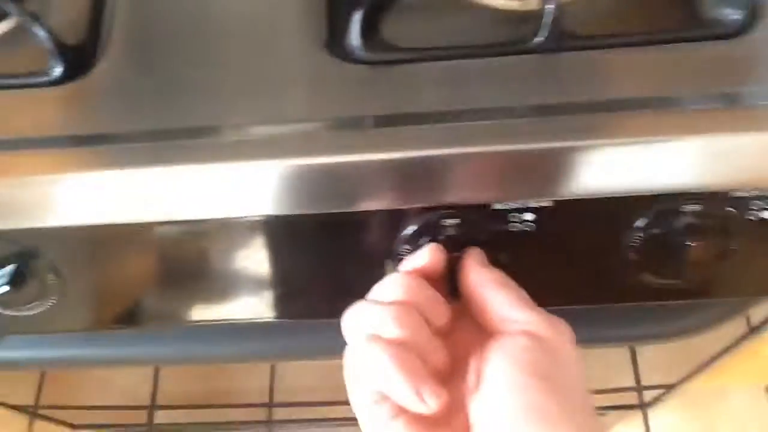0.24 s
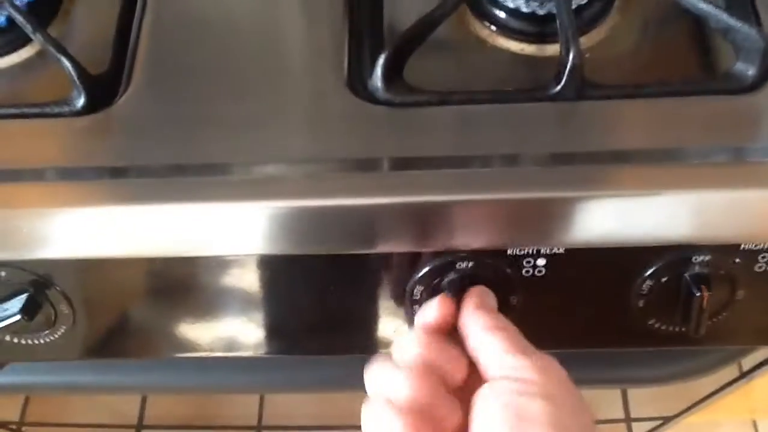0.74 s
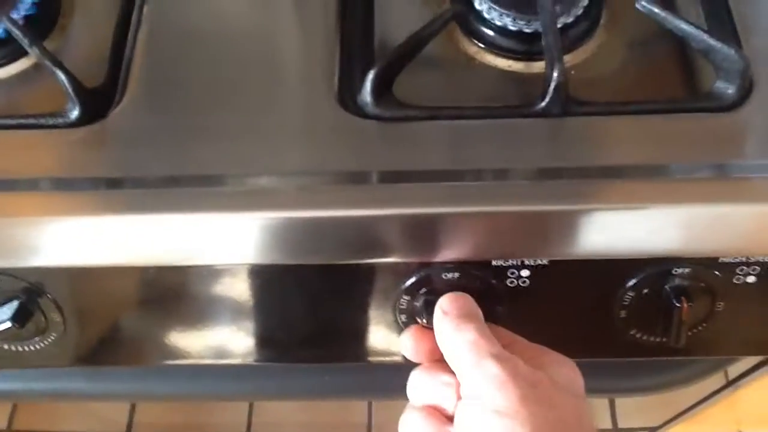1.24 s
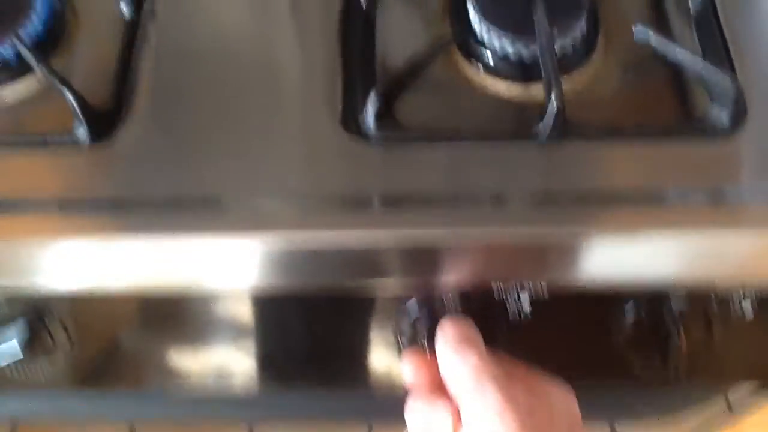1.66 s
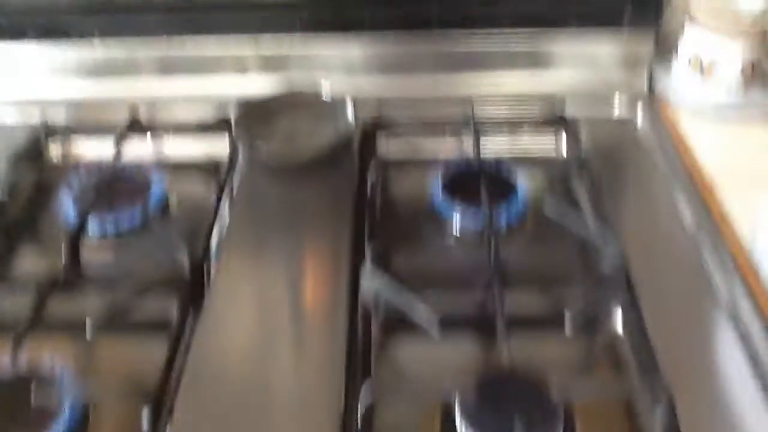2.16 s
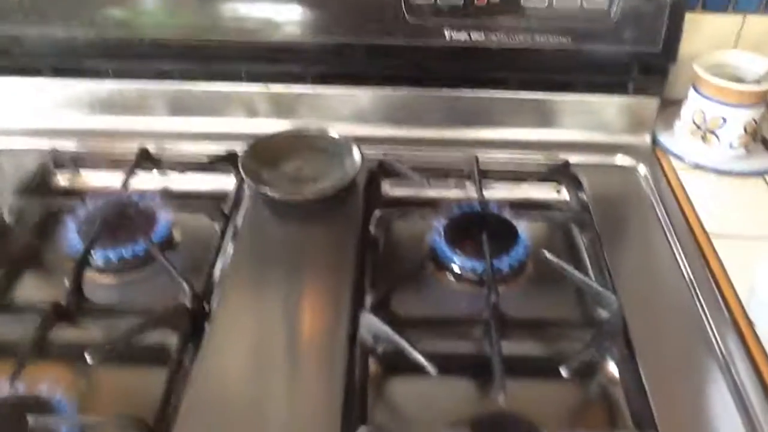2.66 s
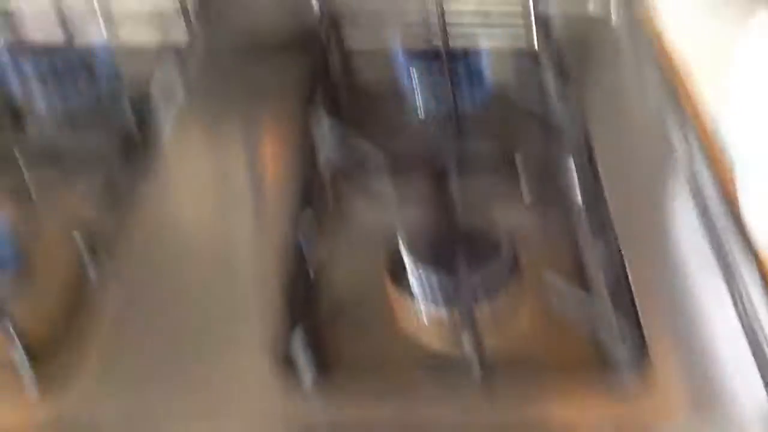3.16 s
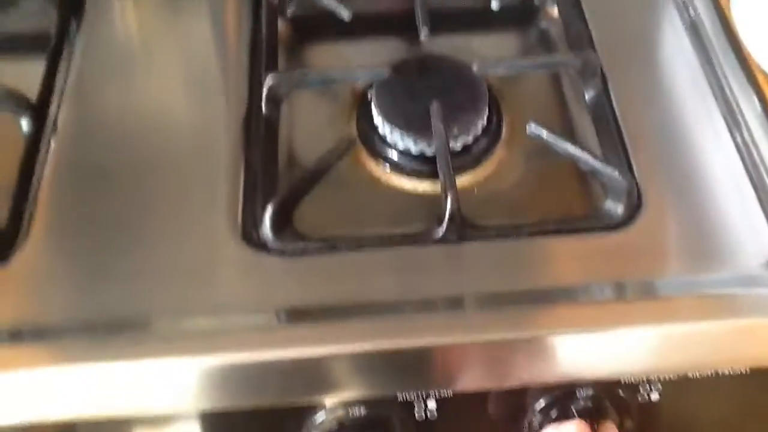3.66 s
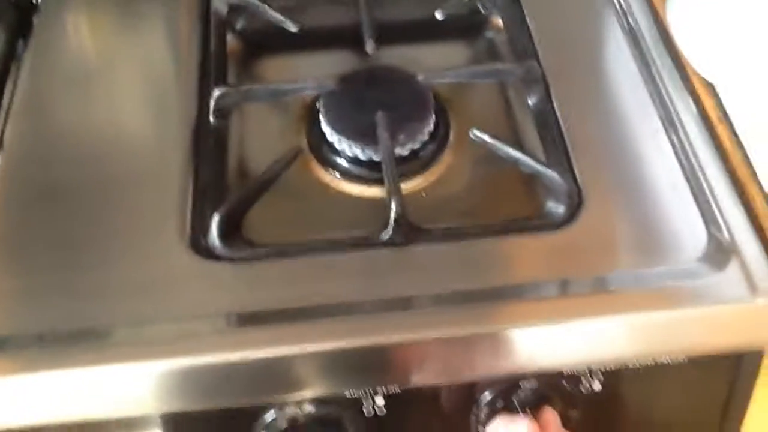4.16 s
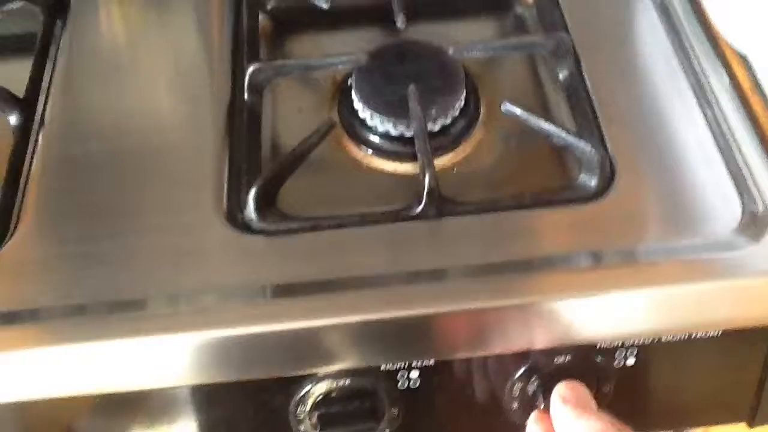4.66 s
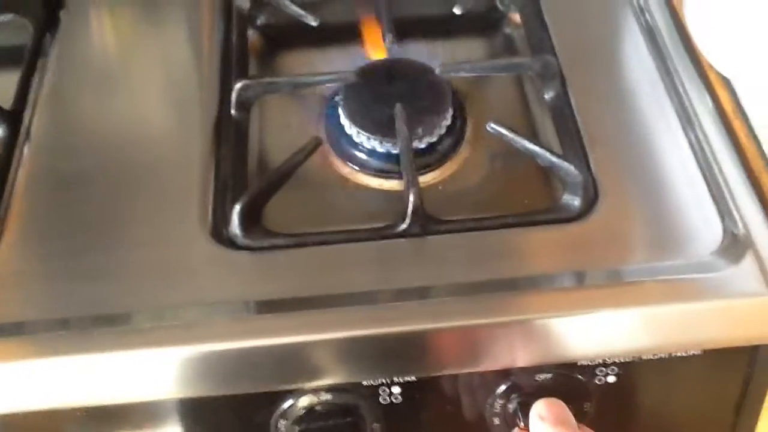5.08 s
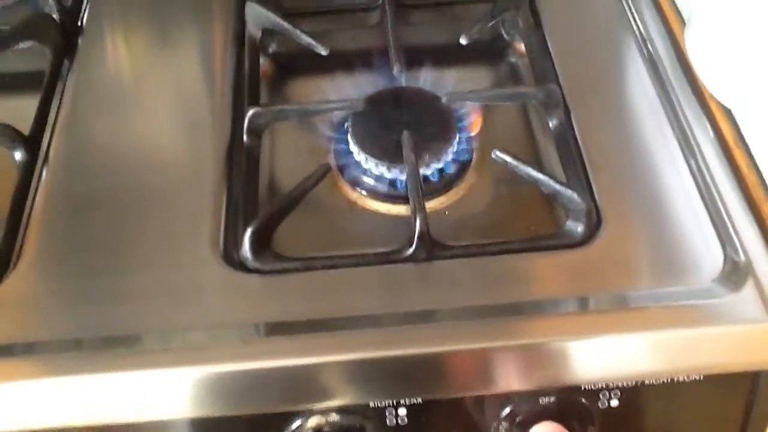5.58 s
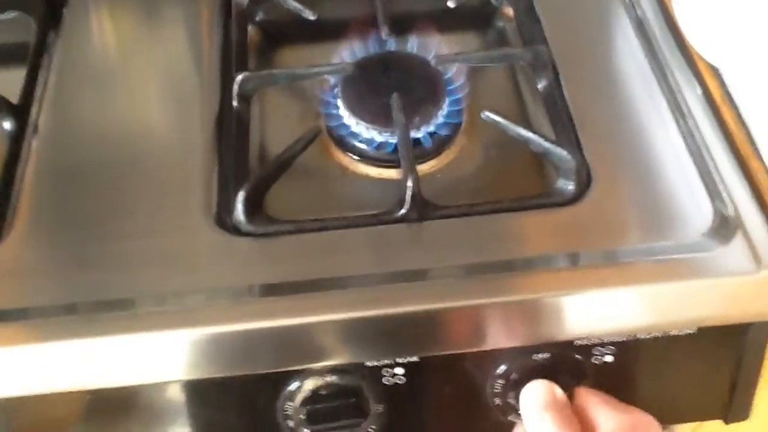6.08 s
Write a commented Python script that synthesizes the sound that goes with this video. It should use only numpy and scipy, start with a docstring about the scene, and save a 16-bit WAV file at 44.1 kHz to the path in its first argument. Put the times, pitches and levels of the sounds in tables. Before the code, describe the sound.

A gas burner igniter snaps rapidly and the flame catches with a soft flutter, twice, amid knob clicks, handling bumps and steady burner hiss.

```python
"""A gas stove in a kitchen, heard by a hand-held phone. From the start lit burners hiss (shaped noise) over the
room's rumble, while the grip sends ticks (noise pushes) and thumps (gliding sines) into the microphone.
From 0.5 s a hand works the plastic knobs: rubs of scraping noise, clicks of ringing modes. From 1.04 s the igniter
sparks about six times a second (noise cracks, echoes) and gas catches with a crackling flutter of random pops.
Near 5 s it sparks and catches again; from 5.3 s one more burner adds to the hiss."""
import sys
import numpy as np
from scipy import signal
from scipy.fft import rfft, irfft, next_fast_len
from scipy.io import wavfile
from scipy.ndimage import map_coordinates

SR = 44100
rng = np.random.default_rng(int(sys.argv[2]) if len(sys.argv) > 2 else 0)


def transcribe(signal):
    """Save signal, clipped to [-1, 1], as a 16-bit WAV file at the path in sys.argv[1]."""
    frames = np.atleast_2d(signal).T
    limited = np.clip(frames, -1, 1)
    pcm = np.round(limited * 32767).astype(np.int16)
    wavfile.write(sys.argv[1], SR, pcm)


N = 279594


def amp(db):
    """Decibels to gain."""
    return 10 ** (np.asarray(db) / 20)


def unit(x):
    """Scaled to rms 1."""
    return x / np.sqrt(np.mean(x ** 2) + 1e-20)


def along(points, hz):
    """Interpolates (f/Hz, value) points on a log frequency axis."""
    f, v = np.transpose(points)
    return np.interp(np.log(hz + 1), np.log(f + 1), v)


def filtered(x, response):
    """x times a complex response of frequency."""
    n = x.shape[-1]
    padded = next_fast_len(n + 4096)
    f_hz = np.fft.rfftfreq(padded, 1 / SR)
    return irfft(rfft(x, padded) * response(f_hz), padded)[..., :n]


def modes(table):
    """Response of (f/Hz, width/Hz, level/dB) resonances, alternating in sign."""
    def response(f):
        total = 0
        for k, (hz, width_hz, db) in enumerate(table):
            damping = 1j * f * width_hz
            total = total + (-1) ** k * amp(db) * damping / (hz * hz - f * f + damping)
        return total
    return response


def noise(spectrum, lumpy_db=0, rate_hz=30, size=N):
    """Coloured noise of rms 1 whose level wanders rate_hz times a second."""
    points = rng.standard_normal(int(size * rate_hz / SR) + 4)
    lumps = map_coordinates(points, [np.arange(size) * rate_hz / SR])
    lumpy = amp(lumpy_db * lumps) * rng.standard_normal(size)
    return unit(filtered(lumpy, lambda hz: amp(along(spectrum, hz))))


def add(track, start_s, peak_db, sound):
    """Lays a sound on the track with its peak at peak_db."""
    track[round(start_s * SR):][:len(sound)] += amp(peak_db) * sound / np.max(np.abs(sound))


def held(start_s, length_s, rise_s, fall_s):
    """A gain that rises, holds at 1 and dies away."""
    t = np.arange(N) / SR - start_s
    return np.clip(t / rise_s, 0, 1) * np.exp(-np.maximum(t - length_s, 0) / fall_s)


BUSY_S = 0.24


def busy(events):
    """Counts the events near each moment, weighted by a window BUSY_S to either side."""
    marks = np.bincount([round(row[0] * SR) for row in events], minlength=N)[:N]
    return signal.fftconvolve(marks, np.hanning(round(2 * BUSY_S * SR)), "same")


# kitchen decay: f/Hz, t60/s
KITCHEN_T60 = [(500, 0.063), (3000, .35), (8000, 0.25), (15000, 0.17)]


def echoes(size):
    """A new tail of kitchen echoes of energy 1, each frequency dying at its own speed."""
    hz, t, z = signal.stft(rng.standard_normal(size), SR, nperseg=128)
    decay = amp(-60 * t / along(KITCHEN_T60, hz)[:, None])
    tail = signal.istft(z * decay, SR, nperseg=128)[1][:size]
    tail *= np.minimum(np.arange(size) / SR / 0.0011, 1)  # the walls answer late
    return tail / np.linalg.norm(tail)


# room rumble spectrum: f/Hz, level/dB per Hz
RUMBLE_SPECTRUM = [(15, -87), (25, -91), (75, -13), (141, 1.5), (165, -1), (179, -5.5), (313, -7),
                   (353, -13.5), (450, -12.5), (580, -38), (990, -120)]
# hand shifting on the phone, spectrum: f/Hz, level/dB per Hz
RUSTLE_SPECTRUM = [(250, -7), (400, -1.5), (600, -0.5), (900, -15.5), (2500, -30.5)]
# burner hiss spectrum: f/Hz, level/dB per Hz
BURNER_SPECTRUM = [(530, -19), (900, -8), (1070, -3), (1240, -1), (1440, 2), (1670, -3.5), (1930, -3),
                   (2250, -7), (2560, -10.5), (2790, -8.5), (3090, -12), (4120, -28), (4500, -26),
                   (5850, -50), (9900, -120)]
# faint whistling of the gas jets: f/Hz, width/Hz, level/dB
JET_MODES = [(1238, 7.3, -2), (1331, 8.5, 0.5), (2800, 120, -17)]
# microphone hiss spectrum: f/Hz, level/dB per Hz
MIC_SPECTRUM = [(2060, -29), (3500, -8), (4850, -8.5), (5250, -8.5), (9130, -10.5), (13700, -11),
                (15200, -11.5)]
RUMBLE_REST_DB, RUSTLE_REST_DB = -57, -67  # hand at rest
RUMBLE_PER_THUMP_DB, RUSTLE_PER_TICK_DB = 0.58, 1
BURNERS_DB, LAST_LIT_S, LAST_ADDS_DB = -64, 5.32, 2  # the nearest burner joins last
MIC_HISS_DB = -70.5


def background():
    """Rumble and rustle come in lumps and grow while the hand is busy; burner and microphone hiss are smooth."""
    rumble_db = RUMBLE_REST_DB + RUMBLE_PER_THUMP_DB * busy(THUMPS)
    rustle_db = RUSTLE_REST_DB + RUSTLE_PER_TICK_DB * busy(TICKS)
    rumble = amp(rumble_db) * noise(RUMBLE_SPECTRUM, lumpy_db=3.0, rate_hz=12)
    rustle = amp(rustle_db) * noise(RUSTLE_SPECTRUM, lumpy_db=3.5, rate_hz=99)
    whistle = unit(filtered(rng.standard_normal(N), modes(JET_MODES)))
    gas = noise(BURNER_SPECTRUM, lumpy_db=0.93, rate_hz=20) + amp(-8.5) * whistle
    lit_db = BURNERS_DB + LAST_ADDS_DB * held(LAST_LIT_S, N / SR, 0.3, 1)
    return rumble + rustle + amp(lit_db) * gas + amp(MIC_HISS_DB) * noise(MIC_SPECTRUM)


# short ticks, from the grip or the catching gas:
# t/s, peak level/dB, level/dB near 2 kHz re peak, level/dB above 4 kHz re peak
TICKS = [(0.06, -43.5, -11, -12), (0.229, -38.5, -16, -19), (0.242, -37.5, -9.5, -20),
         (0.256, -43, -2.5, -23), (0.649, -44, -12, -17), (0.671, -45, -8, -23), (.766, -49, -20, -25),
         (.789, -55, -20, -25), (1.12, -45, -18, -20), (1.233, -36, -8, -14), (1.263, -40.5, -1.5, -16),
         (1.274, -35, -19, -23), (1.322, -36, -37, -30), (1.433, -38.5, -11, -19), (1.676, -39.5, -25, -23),
         (2.243, -36.5, -8.5, -26), (2.354, -43, -17, -24), (2.384, -46, -9, -24), (2.402, -41.5, -9, -23),
         (2.504, -43, -9, -26), (2.519, -46, -20, -26), (3.202, -38, 0.5, -21), (3.231, -48, -5, -17),
         (3.248, -34.5, -22, -32), (3.29, -49, -1, -15), (3.312, -52, -1.5, -20), (3.355, -48, -18, -25),
         (3.405, -47.5, -18, -25), (3.529, -51, -9, -25), (3.536, -39, -27, -28), (3.561, -41, -18, -25),
         (3.571, -43, -17, -25), (3.616, -43.5, -5, -16), (4.212, -42, 0, -7), (4.332, -39, -8, -20),
         (4.498, -41, -9, -17), (4.579, -40.5, -15, -27), (4.882, -43, -5, -9), (5.058, -33, -7, -26),
         (5.09, -35.5, -12, -24), (5.123, -37, 0, -19), (5.133, -49, 7, -16), (5.18, -29, -12, -26),
         (5.214, -39.5, -2, -21), (5.242, -44, 3, -23), (5.256, -38.5, 2, -22), (5.267, -39.5, 0, -24),
         (6.008, -44, -16, -23), (6.195, -40, -12, -20)]
TICK_LAG_S = 0.001214  # first touch to push


def ticks():
    """One brief push, heard through a dull, a middle and a sharp resonance."""
    out, t = np.zeros(N + SR), np.arange(SR // 30) / SR
    parts = [(600, 620), (1800, 920), (6500, 2700)]  # f/Hz, width/Hz
    for start_s, peak_db, *above_db in TICKS:
        decay = amp(-60 * t / 0.0037) + amp(-21 - 60 * t / 0.084)
        push = decay * rng.standard_normal(len(t))
        for (hz, width_hz), level_db in zip(parts, [0, *above_db]):
            ring = modes([(hz, width_hz, 0)])
            add(out, start_s + TICK_LAG_S, peak_db + level_db, filtered(filtered(push, ring), ring))
    return out[:N]


# thumps of the grip: t/s, peak level/dB, level/dB of the bright start re peak
THUMPS = [(0.071, -41, -1), (0.187, -43, -14.5), (0.209, -45.5, 2), (0.314, -40, -11.5), (0.37, -41, -18),
          (0.712, -39.5, -13.5), (1.326, -33, -5), (1.535, -41.5, -19.5), (1.644, -44, -16),
          (1.68, -35, -12), (1.716, -36.5, -12), (1.729, -36.5, -17), (1.914, -38.5, -33),
          (1.932, -38.5, -21.5), (1.945, -34, -18.5), (1.975, -38, -26), (2.065, -36.5, -11.5),
          (2.414, -48, 0), (2.435, -40, -2), (2.459, -35, -3), (2.484, -41, -5), (2.687, -39, -5),
          (2.702, -40.5, -14), (2.738, -35.5, -6.5), (2.769, -35, -10), (2.854, -40, -15.5),
          (2.884, -35.5, -15), (3.202, -40, 4.5), (3.228, -45, 3), (3.248, -36, 3), (3.271, -42, -16),
          (3.292, -40.5, -33), (3.874, -40.5, -10), (3.9, -37.5, -16.5), (3.931, -39, -15.5),
          (4.199, -40.5, -3), (4.22, -35, -17), (4.24, -38.5, -13.5), (4.361, -31, -6), (4.383, -38.5, -11),
          (4.409, -37, -16.5), (4.442, -40.5, -21), (4.588, -41, -11.5), (4.75, -42.5, -23),
          (4.795, -45, -17), (4.824, -46, -13.5), (4.844, -41.5, -15.5), (5.333, -47, -19.5)]
SHARP_DB = -9.5  # a start this bright or brighter falls through the whole glide


def grip():
    """A thump crosses the case as a bending wave: high notes arrive first, so a sharp one falls in pitch."""
    out, t = np.zeros(N + SR), np.arange(SR // 20) / SR
    for start_s, peak_db, bright_db in THUMPS:
        sharp = np.clip(amp(bright_db - SHARP_DB), 0, 1)
        glide_s = 1.65 * sharp * 0.0032 * (1 - np.exp(-t / 0.0025))
        turns = rng.normal(171.8, 11.4) * (t + glide_s) + rng.uniform()  # settles near 172 Hz
        swell = (t / 0.0094) ** 1.42 * np.exp(-(t / 0.0061) ** 1.77)
        swell += 0.17 * amp(-60 * t / 0.098) * (1 - np.exp(-t / 0.0021))
        add(out, start_s, peak_db, swell * np.sin(2 * np.pi * turns))
        bright = t * amp(-60 * t / 0.01) * np.sin(2 * np.pi * rng.uniform(340, 578) * t)
        add(out, start_s, peak_db + bright_db, bright)
    return out[:N]


# knob rubbing on its shaft as it turns: t/s, length/s, level/dB
RUBS = [(.5, 0.09, -70), (.82, .13, -66), (0.928, .03, -59), (3.169, 0.026, -51), (3.546, 0.016, -61),
        (3.905, 0.31, -71), (4.197, 0.058, -69), (4.515, 0.042, -62), (4.603, 0.027, -56.5)]
# knob clicks: t/s, peak level/dB, boost/dB of the lower main mode, scrape level/dB re peak
CLICKS = [(0.6127, -30.5, 3.5, -25), (0.8773, -46, 0.1, -24), (2.8175, -44, 30, -27), (3.1834, -46, 4, -21),
          (3.1899, -36, -1, -12), (3.4346, -36, 8, -11), (3.4436, -41.5, 12, -19), (3.5708, -42, -4, -34),
          (3.6656, -48.5, 2, -26), (3.8137, -39, 2.1, -40), (4.1629, -13.5, 0, -22.5), (4.191, -53, 0, -19),
          (4.6048, -34.5, 3.5, -34), (4.9896, -26.5, 0, -13), (5.463, -37.5, -2, -5), (5.8326, -47, 8, -24),
          (6.329, -29, 30, -8.5)]
# knob modes: f/Hz, level/dB, t60/s
KNOB_MODES = [(1277, -24, 0.049), (1970, 3, 0.015), (2215, 2, 0.023), (3410, 0.5, 0.0039)]
# plastic on plastic, spectrum: f/Hz, level/dB per Hz
SCRAPE_SPECTRUM = [(400, -16), (900, 7), (1600, 3), (3000, -0.5), (6500, -9), (7500, -25), (12000, -35)]
RUB_EDGE_S = 0.015


def knob():
    """A click rings two close main modes, whose beating bunches it early, over a scrape; a rub is scrape alone."""
    out, t = np.zeros(N + SR), np.arange(SR // 4) / SR
    for start_s, peak_db, lower_db, scrape_db in CLICKS:
        struck_db = [0, lower_db, 0, 0]  # where it is struck favours one of the pair
        ring = np.zeros(len(t))
        for k, (hz, level_db, t60_s) in enumerate(KNOB_MODES):
            envelope = amp(level_db + struck_db[k] - 60 * t / t60_s)
            ring += (-1) ** k * envelope * np.sin(2 * np.pi * hz * t)
        ring *= 1 - np.exp(-t / 0.00059)
        reflected = signal.fftconvolve(ring, echoes(len(t)))[:len(t)]
        add(out, start_s, peak_db, ring + amp(-18.0) * reflected)
        decay = amp(-60 * t / 0.015) + amp(-3.5 - 60 * t / 0.19)
        add(out, start_s, peak_db + scrape_db, decay * noise(SCRAPE_SPECTRUM, size=len(t)))
    shaft = modes([(2063, 330, 0)])
    rub = filtered(filtered(noise(SCRAPE_SPECTRUM, lumpy_db=3.0, rate_hz=90), shaft), shaft)
    gain = sum(amp(db) * held(start_s, length_s, RUB_EDGE_S, RUB_EDGE_S) for start_s, length_s, db in RUBS)
    return out[:N] + gain * unit(rub)


# igniter sparks: t/s, crack rms level/dB, dullness/dB (drop from 12 kHz up)
SPARKS = [(1.037, -47.5, 3), (1.2005, -49, 0.5), (1.3669, -49.5, .6), (1.533, -49, -1.2), (1.7, -50, 0),
          (1.8668, -50, 1), (4.9894, -46.5, 2.5), (5.1506, -52.5, 8), (5.3386, -53, 7)]
# spark treble spectrum: f/Hz, level/dB per Hz
SNAP_SPECTRUM = [(1500, -13), (2600, -7), (3600, -4.5), (5000, -6), (6200, -7.5), (8200, -5.5),
                 (10500, -6.5), (13500, -6), (16500, -6.5)]
# steel top rung by the spark: f/Hz, width/Hz, level/dB
HOB_MODES = [(1143, 83, -3.5), (2275, 410, -3.5)]
HOB_DB, HOB_PER_DULL = -7, 0.54  # ring re crack; dB gained per dB of dullness


def igniter():
    """Each spark is an instant crack; what is heard is its scatter off grates and steel top, then off the walls."""
    out, t = np.zeros(N + SR), np.arange(SR // 3) / SR
    for start_s, rms_db, dull_db in SPARKS:
        decay = np.exp(-(t / 0.0013) ** 4) + amp(-5.5 - 60 * t / 0.034) + amp(-10 - 60 * t / 0.067)
        near = decay * np.tanh(2 * rng.standard_normal(len(t)))
        paths = near / np.linalg.norm(near) + amp(-8) * echoes(len(t))
        late = np.pad(paths, (32, 0))[:len(t)]  # 32 samples of travel
        dulling = [(7000, 0), (12000, dull_db)]
        crack = filtered(late, lambda hz: amp(along(SNAP_SPECTRUM, hz) - along(dulling, hz)))
        top = filtered(late, lambda hz: modes(HOB_MODES)(hz) * 1j * hz / (500 + 1j * hz))
        spark = unit(crack) + amp(HOB_DB + HOB_PER_DULL * dull_db) * unit(top)
        out[round(start_s * SR):][:len(t)] += amp(rms_db) * spark
    return out[:N]


# gas catching, long flares with shorter puffs: t/s, length/s, flutter level/dB, crackle level/dB
FLARES = [(1.126, 0.35, -57, -69), (1.109, 0.016, -47, -68), (1.161, 0.022, -57, -55.5),
          (1.216, 0.046, -55.5, -58.5), (1.425, 0.062, -64, -60), (4.984, 0.272, -47, -53.5),
          (5.05, 0.059, -67, -71), (5.145, 0.044, -54, -50), (5.238, 0.038, -53, -52.5)]
# flutter spectrum: f/Hz, level/dB per Hz
FLUTTER_SPECTRUM = [(120, -11), (280, 2), (600, -1.5), (900, -13.5), (1300, -54)]
# crackle spectrum: f/Hz, level/dB per Hz
CRACKLE_SPECTRUM = [(700, -32), (1100, 5.5), (2000, 4.5), (2600, -15), (4000, -16.5), (8000, -48)]
CATCH_S, SETTLE_S = 0.0082, 0.0099  # a flare or puff swells, holds, and stops short
# pockets of gas lighting one after another; BETWEEN_POPS is the gain floor
POPS_PER_S, POP_S, POP_SPREAD_DB, BETWEEN_POPS = 150, 0.0037, 3, 0.48


def flare():
    """Flame runs round the burner ring: uneven flutter under a spiky crackle; both jump with each pop."""
    flutter_gain, crackle_gain = sum(
        amp(levels_db)[:, None] * held(start_s, length_s, CATCH_S, SETTLE_S)
        for start_s, length_s, *levels_db in FLARES)
    pops = (rng.uniform(size=N) < POPS_PER_S / SR) * amp(POP_SPREAD_DB * rng.standard_normal(N))
    # each pop decays exponentially over POP_S
    jumps = BETWEEN_POPS + filtered(pops, lambda hz: POP_S * SR / (1 + 2j * np.pi * hz * POP_S))
    flutter = np.sqrt(np.abs(jumps)) * noise(FLUTTER_SPECTRUM, lumpy_db=3.5, rate_hz=78)
    crackle = jumps * noise(CRACKLE_SPECTRUM, lumpy_db=4.0, rate_hz=270)
    return flutter_gain * unit(flutter) + crackle_gain * unit(crackle)


def scene():
    """All sources at one microphone."""
    return (background() + ticks() + grip() + knob() + igniter() + flare())[None]


TOP_HZ = 16540


def record(dry):
    """The phone weakens the deep bass and the last treble, and keeps nothing above its band limit."""
    def response(hz):
        bass = (1j * hz / (70 + 1j * hz)) ** 2
        treble = amp(np.interp(hz, [15000, 15500], [0, -30]))
        return bass * treble * (hz < TOP_HZ)
    return filtered(dry, response)


dry = scene()
out = record(dry)
transcribe(out)
```